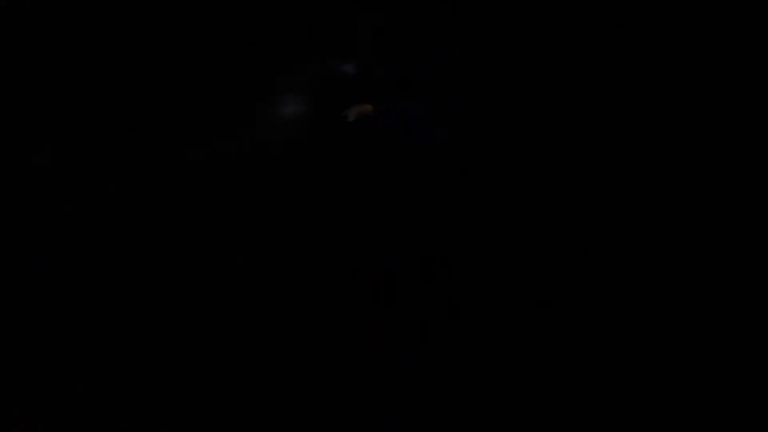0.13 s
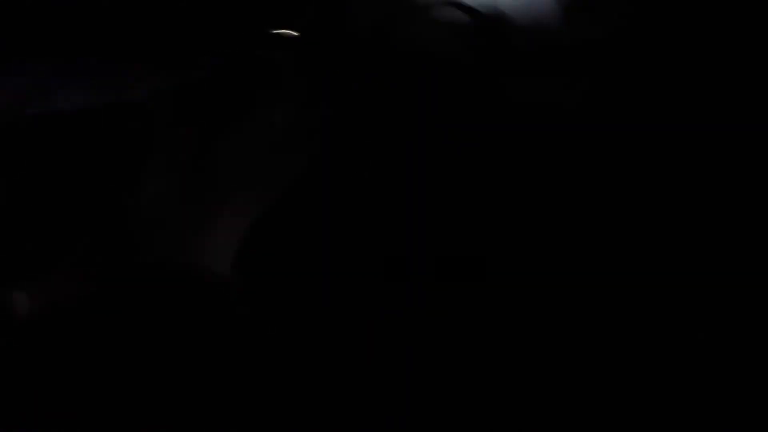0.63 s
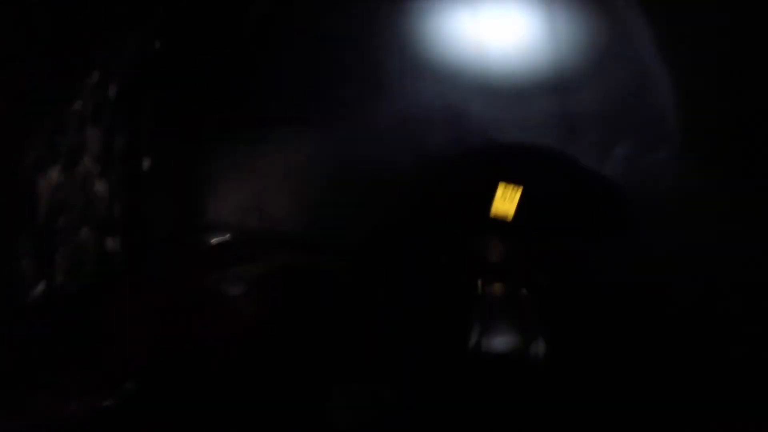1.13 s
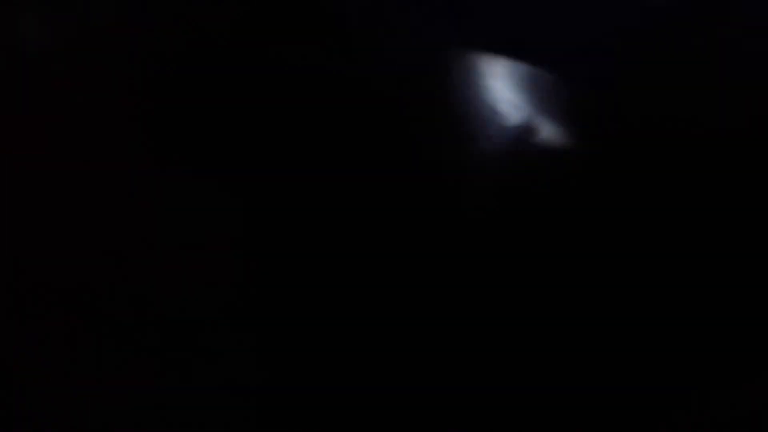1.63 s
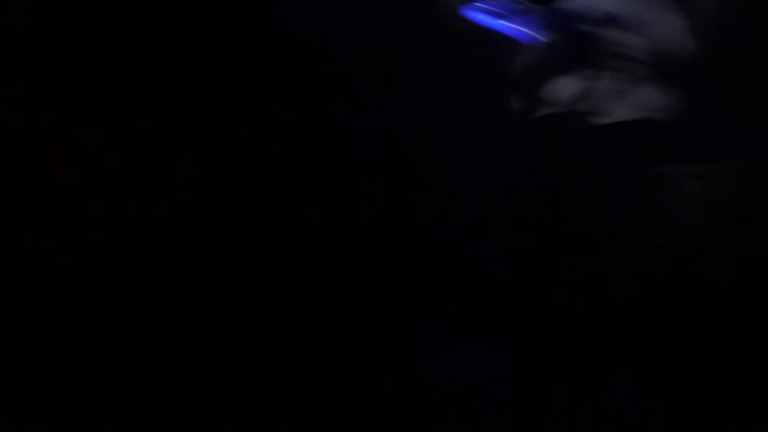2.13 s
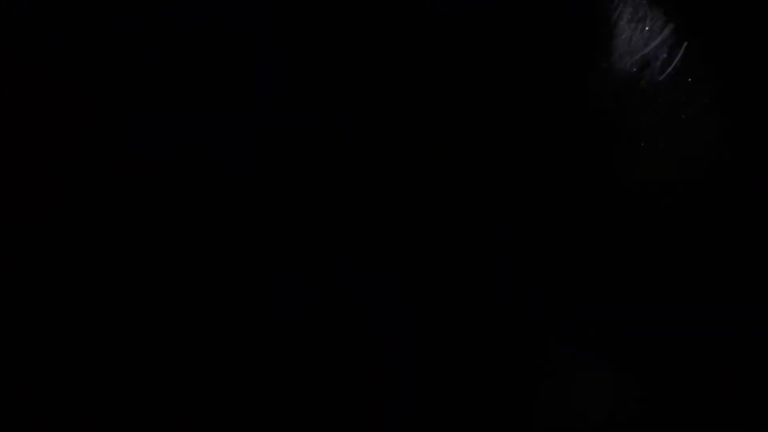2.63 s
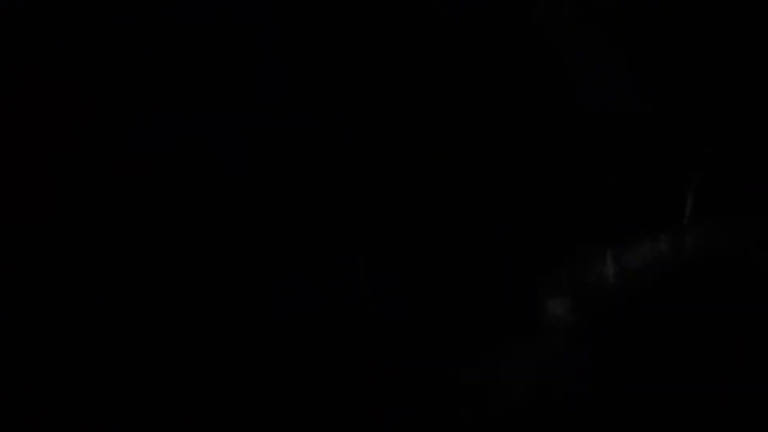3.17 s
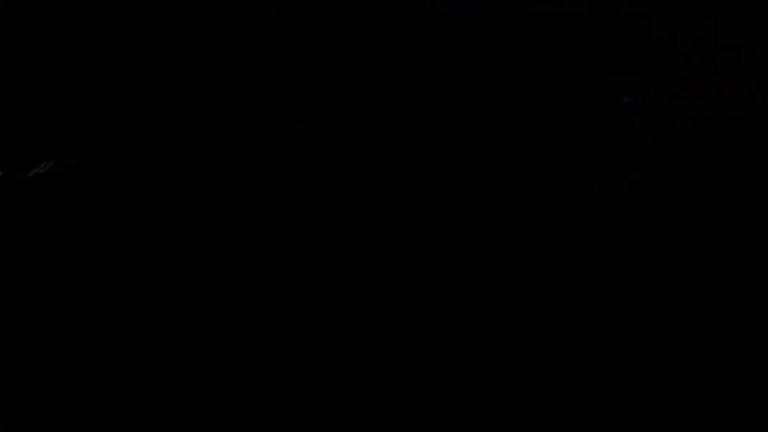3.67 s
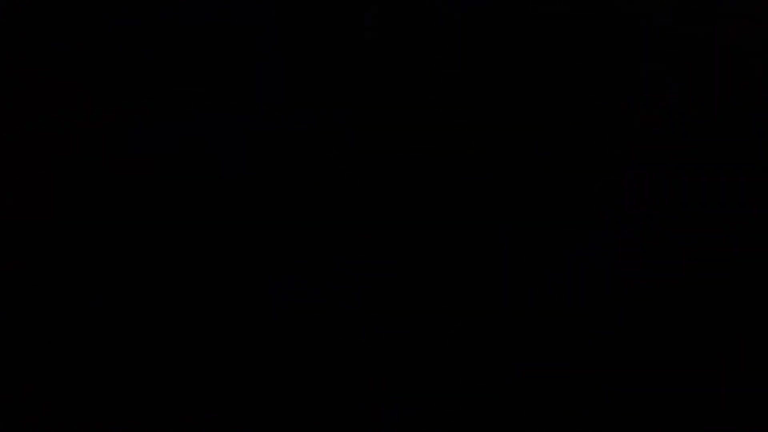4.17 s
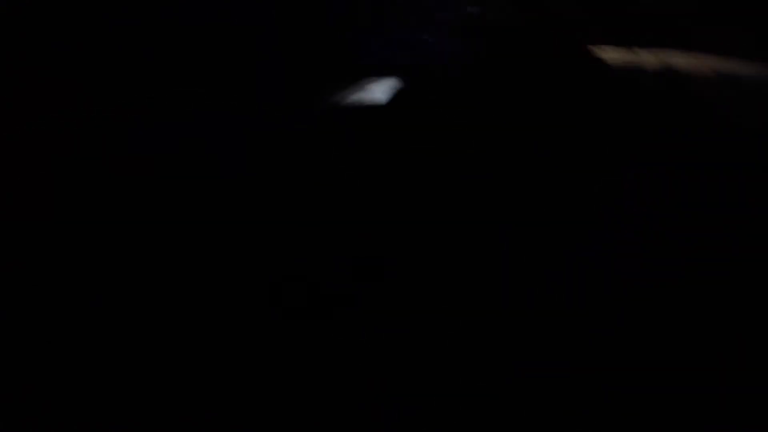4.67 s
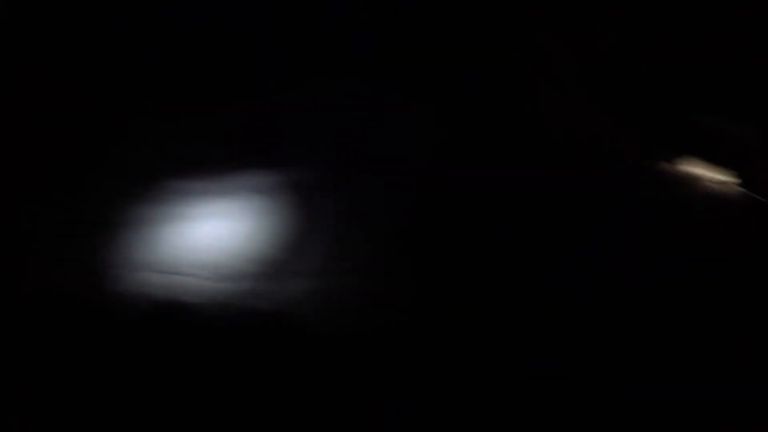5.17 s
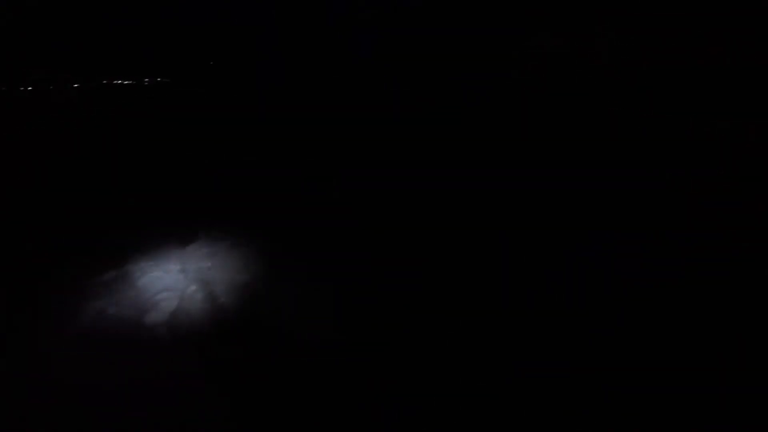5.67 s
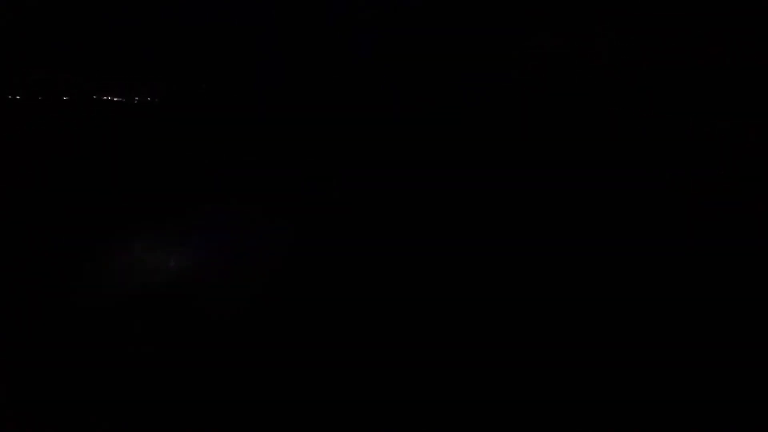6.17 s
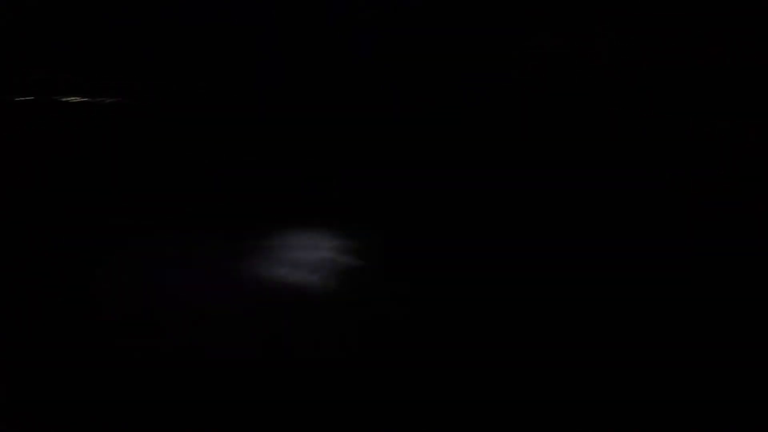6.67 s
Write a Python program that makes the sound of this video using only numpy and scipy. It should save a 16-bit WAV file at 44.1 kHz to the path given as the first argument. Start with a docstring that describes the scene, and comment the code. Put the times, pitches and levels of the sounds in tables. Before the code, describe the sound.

Close engine roar dips and climbs, violent snow impacts hit the microphone, then rough uneven idling continues with sharp ticks and glove rubs.

```python
"""A three-cylinder snow machine slows, thumps down, then revs hard under a helmet camera: tones locked to
the engine cycle ride over beating noise, track gears whine as swept tones, and snow sprays as grainy noise.
The rider tumbles: snow slams the camera as short noise bursts through the modes of its case.
The engine settles to a lumpy idle of pulses ringing a silencer and pipe, with noisy clatter.
Meanwhile ice and, late on, valve taps click, gloves rub on the case, and wind and bumps shake the microphone."""
import sys
import numpy as np
from scipy import signal
from scipy.fft import rfft, irfft, next_fast_len
from scipy.io import wavfile
from scipy.ndimage import uniform_filter1d, map_coordinates

SR = 44100
rng = np.random.default_rng(int(sys.argv[2]) if len(sys.argv) > 2 else 0)


def undo_db(level):
    """Turn decibels back into plain size, where 20 dB means ten times bigger."""
    steps = np.asarray(level, float) / 20
    return 10 ** steps


def dump(signal):
    """Clip the signal to [-1, 1] and save it as 16-bit WAV at the path in sys.argv[1]."""
    limited = np.clip(np.atleast_2d(signal).T, -1, 1)
    pcm = np.round(limited * 32767).astype(np.int16)
    wavfile.write(sys.argv[1], SR, pcm)


N = 300321
T = np.arange(N) / SR

# Wind buffeting, riding and then lying in the snow. Each row: time in seconds, relative level in dB.
WIND_SPELLS = [
    [(0.0, -34), (0.3, -31), (0.95, -39), (1.3, -30), (1.6, -32)],
    [(1.76, -48), (2.1, -57), (2.4, -50), (2.76, -53), (3.2, -40), (3.6, -50), (4.3, -55), (4.6, -59),
     (6.81, -57)],
]
# Bumps on the camera. Each row: start in seconds, swing in Hz, relative level in dB, direction +1 or -1.
BUMPS = [(0.15, 40, -12, 1), (0.158, 67, -6.5, 1), (0.167, 45.6, -4, -1), (0.188, 51, -10, 1),
         (0.24, 30, -21, -1), (1.42, 35, -18.5, 1), (1.424, 76, -11, 1), (1.438, 100, -11, -1),
         (1.6141, 137, 1, -1), (1.617, 160, -1.5, 1), (1.62, 110, -24, 1), (1.6245, 111, -10, -1),
         (1.6355, 152, -9.5, -1), (1.646, 60, -15, 1), (1.7042, 107, -7.5, -1), (1.712, 90, -11, 1),
         (1.726, 204, -9.5, -1), (1.739, 40, -25, -1), (2.299, 40.4, -30, 1), (2.326, 64.4, -19.5, 1),
         (2.35, 29.4, -24.5, 1), (2.965, 35, -25.5, 1), (4.233, 40, -22, 1), (5.961, 30, -37, 1),
         (6.34, 28, -32, 1)]
# Thin tones that start as the tumble's slams die down. Each row: start in seconds, pitch in Hz,
# peak level in dB, time to fall 60 dB in seconds.
LINGERING_TONES = [(1.742, 1870, -43, .25), (1.72, 465, -46, 2.2)]

# Snow and knuckles slam the case. Each row: start in seconds, length in seconds, relative level in dB,
# treble drive in dB over it.
SLAMS = [(0.16, 0.006, -12, -4.5), (0.183, 0.014, -20.5, -6), (1.613, 0.0085, 4.5, -5),
         (1.6182, 0.005, -5, -4), (1.626, 0.006, -15, -8), (1.6299, 0.013, -7.5, -11),
         (1.638, 0.007, -18, -5), (1.6467, 0.014, -9, -5.5), (1.659, 0.008, -28, -4),
         (1.6638, 0.0087, -33, -8), (1.697, 0.007, -30, -7), (1.7039, 0.0055, -5, -11),
         (1.7133, 0.016, -6.5, -10), (1.7193, 0.018, -13, -12), (1.735, 0.025, -37, 2),
         (1.757, 0.016, -36, -16), (3.234, 0.018, -38, -20), (3.259, 0.015, -30.5, 0),
         (4.228, 0.15, -31, 1)]
# Gloves rub along the case. Each row: start in seconds, length in seconds, relative level in dB,
# treble drive in dB over it, low knock drive in dB over it.
RUBS = [(1.842, 0.21, -48, -1.5, -30), (2.314, 0.018, -40.5, -19, 14), (2.333, 0.015, -33, -21, 7.5),
        (2.348, 0.014, -38, -15, 0), (2.885, 0.067, -43, -6, -8), (3.237, 0.1, -32.5, 2, -9),
        (3.235, 0.02, -53.5, -20, 29.5), (3.392, 0.11, -30, -2, -35), (3.477, 0.15, -38.5, -1.5, -17),
        (3.605, 0.096, -37.5, -33, -25), (4.192, 0.12, -36.5, -5, -3), (4.227, 0.029, -55, -20, 30.5),
        (4.375, 0.18, -39, -5, -27), (4.427, 0.21, -48, 5.5, -12)]
# Ticks near the camera: ice, and late on some valve taps of the engine. Each row: start in seconds,
# relative level in dB, treble drive in dB over it.
TICKS = [(2.3158, -25, -5), (2.3978, -12, -3), (2.4244, -23, 14), (2.437, -23, 7), (2.444, -8.5, -2),
         (2.4804, -11.5, 14.5), (2.586, -30, 10), (2.605, -36, 17), (2.6902, -19, 13), (2.7505, -34, 22.5),
         (2.758, -32, 16), (2.8795, -17, 0), (2.92, -25, 14), (2.9635, -14, 18), (2.9683, -10, 4),
         (3.002, -19, 5), (3.031, -11.5, -13), (3.092, -12, -25), (3.323, 7.5, 1.5), (3.3448, -15, 2),
         (4.2197, -10, -12), (5.011, -14.5, -5), (5.2593, -14.5, -2.5), (5.285, -20, -14), (5.997, -24, -5),
         (6.156, -26, -7), (6.52, -25, -2), (6.705, -28, -5)]
# Low modes of the camera case, the knock first. Each row: centre in Hz, width in Hz, relative level in dB.
CASE_LOW_MODES = [(680, 102, 3), (1396, 1330, -5), (2406, 510, 2.5), (3590, 250, -3)]
# High modes of the case. Each row: centre in Hz, width in Hz, relative level in dB.
CASE_HIGH_MODES = [(5050, 2400, -3.5), (6700, 1150, 1), (8720, 950, -5), (12000, 3800, -12.5)]

# Track gear whine. Each row: time in seconds, pitch in Hz, peak level in dB,
# peak level in dB of the tone at four times the pitch.
GEAR_WHINE = [(.72, 2010, -45, -67), (.775, 2255, -24, -62), (.88, 2630, -27, -61), (1.05, 3050, -31, -69),
              (1.15, 3178, -60, -40), (1.245, 3275, -40, -35), (1.27, 3303, -21, -36),
              (1.32, 3290, -26, -35), (1.36, 3320, -36, -37), (1.42, 3301, -62, -76)]

# Idle after the fall, as the rider turns about. Each row: time in seconds, then the relative levels of
# exhaust thump in dB, pipe note over it in dB, and clatter in dB.
IDLE_LEVELS = [(1.665, -40, -3, -68), (1.76, -38, -8, -49), (1.81, -42, -7, -42),
               (1.87, -39.5, -12.5, -40.5), (2.15, -38.5, -11, -39.5), (2.33, -35, -32, -38),
               (2.45, -40, -16, -42), (2.81, -34.5, -12.5, -43.5), (3.11, -31.5, -10, -36),
               (3.3, -28.5, -18.5, -32.5), (3.66, -26.5, -14.5, -38), (4.05, -27.5, -20.5, -33),
               (4.35, -28.5, -17, -32), (4.5, -31, -14, -35.5), (4.8, -31, -26, -32.5),
               (5.04, -32.5, -22, -32.5), (5.43, -34, -14, -32), (5.77, -33.5, -16, -37.5),
               (6.81, -34.5, -17, -38.5)]
# Engine speed after the fall. Each row: time in seconds, engine cycles in Hz.
IDLE_SPEED = [(1.75, 33.0), (1.9, 26.99), (2.0, 24.06), (2.1, 19.55), (2.2, 17.38), (2.6, 16.51),
              (2.8, 17.1), (3.1, 15.21), (3.35, 14.39), (3.7, 13.65), (5.0, 12.35), (5.5, 12.84),
              (6.0, 12.43), (6.25, 12.87), (6.81, 12.56)]
# Strength of the three firings of a cycle, one relative level in dB each.
CYLINDER_DB = [0, -11, -.5]
# Uneven spacing of the three firings, one lag in seconds each.
CYLINDER_LAG_S = [0, -.001, .0009]
# Resonances of silencer, pipe and upper pipe, one list each. Each row: centre in Hz, width in Hz,
# relative level in dB.
PIPE_MODES = [
    [(109.4, 49, 20.5), (160, 32, 15.5), (243, 13, 18)],
    [(318, 52, 0)],
    [(458, 87, 0)],
]
# Tones of the pipe, gliding with the engine's firing rate. Each row: multiple of the firing rate,
# relative level in dB.
PIPE_TONES = [(7, -1), (8, 3.5), (9, -18), (10, -16)]
# Where those tones sing loudest. Each row: centre in Hz, width in Hz, relative level in dB.
PIPE_TONE_MODES = [(345, 110, 0)]
# Tones of the upper pipe. Each row: multiple of the firing rate, relative level in dB.
UPPER_TONES = [(12, -1), (13, -3.5)]
# Spells in which the upper pipe comes forward. Each row: start in seconds, length in seconds.
UPPER_SPELLS = [(1.61, 0.35), (3.75, 2.1)]
# Valve taps. Each row: lead on the firing in firings, relative level in dB, decay constant in firings.
VALVE_TAPS = [(.43, 1, .12), (.22, -6, .1), (.9, -9, .08)]
# Colour of the clatter. Each row: frequency in Hz, relative level in dB per Hz.
CLATTER_COLOUR = [(230, -9), (330, -3), (480, -8), (533, -9), (590, -11), (742, -12), (1180, -5),
                  (1370, -1), (2280, -3.5), (2600, -2), (3000, -7), (3420, -12), (4500, -13.5), (5850, -40),
                  (9900, -120)]
# Colour of the hiss. Each row: frequency in Hz, relative level in dB per Hz.
HISS_COLOUR = [(2470, -36), (4200, -35), (5050, 0), (5620, -5.5), (6910, -2.5), (8310, -14.5),
               (9940, -10.5), (11100, -17.5), (15000, -25), (16000, -52)]

# Riding. Each row: time in seconds, engine cycles in Hz, loudness of the machine in dB, throttle from 0 to 1.
RIDE = [(0.0, 57.97, -19.5, 0.63), (0.05, 56, -22, 0.6), (0.075, 53, -24, 0.1), (0.124, 46.04, -25, 0),
        (0.19, 40.5, -34, 0.45), (0.34, 34.73, -37, 0.4), (0.39, 36.5, -30.5, 1), (0.506, 46.1, -28.5, 1),
        (0.604, 55.17, -25.5, 1), (0.712, 63.95, -22.5, 0.91), (0.788, 67.7, -22, 0.68),
        (0.86, 70.07, -20, 0.86), (1.004, 70.5, -21.5, 0.85), (1.156, 75.8, -20.5, 0.62),
        (1.282, 77.2, -18.5, 0.96), (1.35, 77.2, -19, 0.5), (1.39, 76.2, -18.5, 0.15),
        (1.524, 63.6, -20.5, 0), (1.61, 61.95, -21, 0)]
# Engine tones. Each row: order (multiple of the cycle rate), level in dB over the roar at full throttle,
# before the exhaust colours it.
ENGINE_ORDERS = [(1, -18.5), (2, -17), (3, -2), (4, -10.5), (5, -6), (6, -1.5), (7, -18), (8, -18),
                 (9, 3.5), (10, -17), (11, -33), (12, -1), (13, -19), (14, -30), (15, -5), (16, -28),
                 (17, -9.5), (18, -9), (19, -21), (20, -21), (21, -11)]
# What the exhaust passes. Each row: frequency in Hz, gain in dB.
EXHAUST_PASS = [(110, 5), (170, 1), (215, -7), (260, 3), (330, 3.5), (420, -9), (500, 1), (600, -6.5),
                (690, -5.5), (800, -21), (900, -7), (1400, -16)]
# Colour of the roar. Each row: frequency in Hz, relative level in dB per Hz.
ROAR_COLOUR = [(35, -40), (60, -9.5), (227, -1), (281, 5), (458, -8.5), (785, -13.5), (1220, -13.5),
               (1470, -10), (1660, -13), (2140, -11.5), (4220, -16.5), (6430, -15.5), (13000, -52),
               (14900, -78.5), (16000, -69)]
# Body panels ringing in the roar. Each row: centre in Hz, width in Hz, relative level in dB.
COWL_MODES = [(1494, 73, 7.5), (2275, 157, 11)]
# Colour of the snow spray. Each row: frequency in Hz, relative level in dB per Hz.
SPRAY_COLOUR = [(880, -44), (1500, 0.5), (1920, -13), (2250, -1), (3060, 4), (4240, -12), (4780, -2),
                (7460, -8), (13100, -15.5), (15400, -33), (16000, -70)]


def unit(x):
    """Scaled to rms 1."""
    return x / np.sqrt(np.mean(x ** 2) + 1e-20)


def steady(x):
    """Scaled to a running rms of 1 over a third of a second."""
    return x / np.sqrt(np.abs(uniform_filter1d(x ** 2, SR // 3)) + 1e-12)


def ramp(start_s, rise_s):
    """Climbs from 0 to 1."""
    return np.clip((T - start_s) / rise_s, 0, 1)


def curves(rows):
    """A gate over the table's span with 5 ms fades outside it, then one value per sample for each column."""
    s, *columns = np.transpose(rows)
    gate = np.clip(np.minimum(T - s[0] + .005, s[-1] + .005 - T) / .005, 0, 1)
    return [gate] + [np.interp(T, s, column) for column in columns]


def wobble(rate):
    """A smooth random curve, rate knots a second."""
    knots = rng.standard_normal(int(N * rate / SR) + 4)
    return map_coordinates(knots, [T * rate])


def noise():
    """Fresh white noise."""
    return rng.standard_normal(N)


def filtered(x, response):
    """x times a complex response of frequency."""
    m = next_fast_len(N + SR // 2)
    return irfft(rfft(x, m) * response(np.fft.rfftfreq(m, 1 / SR)), m)[:N]


def resonant(x, modes, sign=-1):
    """x through causal (Hz, width, dB) resonances; a negative sign fills their valleys, a positive deepens them."""
    def response(f):
        return sum(sign ** k * undo_db(db) * 1j * f * width / (hz * hz - f * f + 1j * f * width)
                   for k, (hz, width, db) in enumerate(modes))
    return filtered(x, response)


def coloured(x, spectrum):
    """x shaped by (Hz, dB) points on a log axis, rms 1."""
    hz, db = np.transpose(spectrum)
    return unit(filtered(x, lambda f: undo_db(np.interp(np.log(f + 1), np.log(hz + 1), db))))


def wind():
    """Lumpy low buffeting of the microphone: dark noise with a wandering level."""
    level = sum(gate * undo_db(db + 9.0) for gate, db in map(curves, WIND_SPELLS))
    lumps = undo_db(2.5 * wobble(10))
    rumble = coloured(noise(), [(10, 2.5), (24, 1), (45, -15), (90, -15.5), (300, -64.0)])
    return level * unit(lumps * rumble)


def bumps():
    """Each bump swings the microphone membrane once or twice."""
    out = np.zeros(N + SR)
    t = np.arange(SR // 5) / SR
    for s, hz, db, direction in BUMPS:
        cycles = t * hz
        swing = np.sin(2 * np.pi * cycles) * np.exp(-1.8 * cycles ** 1.3)
        out[round(s * SR):][:len(t)] += direction * undo_db(db + 4.5) * swing
    return out[:N]


def lingering_tones():
    """Thin, slightly unsteady tones that start as the tumble's slams die down and fade exponentially."""
    out = 0
    for s, hz, db, t60 in LINGERING_TONES:
        since = np.clip(T - s, 0, None)  # zero, hence silent, before the start
        out = out + undo_db(db - 60 * since / t60 + 1.1 * wobble(24.8)) * np.sin(2 * np.pi * hz * since)
    return out


def case():
    """Slams, gritty rubs and sharp ticks, all noise bursts heard through the modes of the camera case."""
    low, knock, high = np.zeros((3, N))
    grit = noise() * undo_db(3.8 * wobble(450) + 1.2 * wobble(70))
    # slams die by 24 dB over their length and knock at -9 dB; rubs hold their level
    contacts = [(*row, -9, 24) for row in SLAMS] + [(*row, 0) for row in RUBS]
    for s, length, db, treble_db, knock_db, fade_db in contacts:
        u = np.linspace(0, 1, round(length * SR))
        span = slice(round(s * SR), round(s * SR) + len(u))
        envelope = np.clip(np.minimum(u * 16, (1 - u) * 3), 0, 1)
        contact = grit[span] * undo_db(db - fade_db * u) * envelope
        low[span] += contact
        knock[span] += undo_db(knock_db) * contact
        high[span] += undo_db(treble_db) * contact

    # 32 faint ticks as the snow settles, from 2.38 to 2.96 s
    crackle = [(2.38 + 0.58 * when, -44 + 10 * (size - .5), 15) for when, size in rng.random(size=(32, 2))]
    t = np.arange(SR // 100) / SR
    for s, db, treble_db in TICKS + crackle:
        tick = undo_db(db - 13.0 - 60 * t / 0.0063) * rng.standard_normal(len(t))  # falls 60 dB in 6.3 ms
        low[round(s * SR):][:len(t)] += tick
        high[round(s * SR):][:len(t)] += undo_db(treble_db) * tick
    body = resonant(low, CASE_LOW_MODES[1:]) + resonant(knock, CASE_LOW_MODES[:1])
    return undo_db(10.0) * body + undo_db(3.0) * resonant(high, CASE_HIGH_MODES)


def whine():
    """The track's gear teeth sing, unevenly, as the machine gains speed."""
    gate, hz, db, fourth_db = curves(GEAR_WHINE)
    phase = 2 * np.pi * np.cumsum(hz * (1 + .011 * wobble(250))) / SR
    fourth_phase = 2 * np.pi * np.cumsum(4 * hz * (1 + .003 * wobble(150))) / SR
    tones = undo_db(db) * np.sin(phase) + undo_db(fourth_db) * np.sin(fourth_phase)
    return gate * undo_db(1.8 * wobble(40)) * tones


def firing_pulses(firings, settled):
    """A strong, a weak and a strong puff each cycle, slightly uneven, plus turbulence, rounded by the silencer."""
    number = np.floor(firings).astype(int)
    at = np.flatnonzero(np.diff(number)) + 1
    cylinder = number[at] % 3
    strength = undo_db(np.array(CYLINDER_DB)[cylinder] + .8 * rng.standard_normal(len(at)))
    jitter = 6 * rng.standard_normal(len(at))  # in samples
    place = at + np.round(jitter + SR * np.array(CYLINDER_LAG_S)[cylinder]).astype(int)
    pulses = np.bincount(np.clip(place, 0, N - 1), strength, N)
    pulses += np.interp(settled, [.5, 1], [.022, .002]) * noise()  # less turbulence once settled
    return filtered(pulses, lambda f: 1 / (1 + 1j * f / 380) ** 4)


def idle_exhaust(firings, thump_db, note_db):
    """Firing pulses ring the silencer and pipe over a clean hum and tones locked to the firings."""
    settled = np.clip(ramp(2.05, .45), .1, 1)  # clean tones form once the engine has slowed
    facing = 1 - 0.57 * ramp(4.6, .3)  # silencer body and tones fade as the rider turns from it
    forward = sum(ramp(s, 0.14) - ramp(s + length, 0.12) for s, length in UPPER_SPELLS)

    soft = firing_pulses(firings, settled)
    silencer_modes, pipe_modes, upper_modes = PIPE_MODES
    body_modes, upper_tone_modes = [(273, 116, 0)], [(505, 80, 0)]
    thump = steady(resonant(soft, silencer_modes, sign=0.86))
    # passed twice for steep sides
    note = steady(resonant(resonant(soft, pipe_modes), pipe_modes))
    upper = steady(resonant(resonant(soft, upper_modes), upper_modes))
    body = steady(resonant(resonant(soft, body_modes), body_modes))

    # twice a firing: the intake breathes in between
    hum = np.sqrt(2) * np.cos(2 * np.pi * (2 * firings - .3))
    uneven = undo_db(np.array(CYLINDER_DB)[np.floor(firings).astype(int) % 3])
    drift = .25 * wobble(6)

    def sing(tones):
        return uneven * sum(undo_db(db) * np.cos(2 * np.pi * (k * firings - .5) + drift) for k, db in tones)

    note += 0.89 * facing * settled * resonant(sing(PIPE_TONES), PIPE_TONE_MODES)
    upper_song = resonant(resonant(sing(UPPER_TONES), upper_tone_modes), upper_tone_modes)
    upper += 2.2 * settled * forward * upper_song

    mix = thump + 1.03 * ramp(2.6, 0.92) * hum
    mix += undo_db(-13) * facing * body
    mix += undo_db(note_db + 6.5) * note
    mix += undo_db(-27.5 + 9.5 * forward) * upper
    return undo_db(thump_db - 3.5) * mix


def valve_taps(firings):
    """Loudness swing of the clatter: each tap rises fast and decays, its strength scattered by 2 dB."""
    scatter = rng.standard_normal(int(firings[-1]) + 3)
    stroke = 0
    for lead, db, decay in VALVE_TAPS:
        shifted = firings + lead
        age = shifted % 1
        strength = undo_db(db + 2 * scatter[np.floor(shifted).astype(int)])
        stroke = stroke + strength * (1 - np.exp(-age / .07)) * np.exp(-age / decay)
    tapping = np.interp(ramp(5.52, .99), [0, 1], [.65, 1.2])  # more as the rider faces the engine
    return .5 + 3.2 * tapping * stroke


def idle_clatter(firings, clatter_db):
    """Noise pulsed by the valve taps rings the panels, hisses, and is mirrored by the snow."""
    taps = valve_taps(firings)
    raw = coloured(taps * noise(), CLATTER_COLOUR)
    ringing = ramp(2.2, 0.87) * resonant(raw, [(2362, 16, 1.3), (1152, 17, 10.6)])
    clatter = undo_db(0.26 * wobble(4.44)) * unit(raw + ringing)
    # a cowl panel rings while it points at the camera
    pointing = ramp(2.3, 0.75) - ramp(4.0, 0.6)
    clatter += pointing * resonant(raw, [(1557, 70, 0)])
    grains = np.sqrt(taps) * noise() * undo_db(1.9 * wobble(300))
    hiss = undo_db(-13.5 + wobble(4.3)) * coloured(grains, HISS_COLOUR)

    # the delayed copy combs the sound, its first peak at 2750 Hz
    direct = clatter + hiss
    mirrored = filtered(direct, lambda f: np.exp(-2j * np.pi * f / 2750) / (1 + (f / 3500) ** 4))
    echo = np.interp(ramp(4.92, .99), [0, 1], [.3, .85])
    return undo_db(clatter_db - 7.0) * (direct + echo * mirrored) / np.sqrt(1 + echo ** 2)


def idle():
    """Lumpy idle after the fall: exhaust and clatter share one count of firings, three per engine cycle."""
    gate, thump_db, note_db, clatter_db = curves(IDLE_LEVELS)
    firings = 3 * np.cumsum(curves(IDLE_SPEED)[1]) / SR
    return gate * (idle_exhaust(firings, thump_db, note_db) + idle_clatter(firings, clatter_db))


def spray(roar_db):
    """Thrown snow: grainy noise that grows faster than the roar."""
    landing_db = 1.5 * (1 - ramp(.16, .01))  # snow flies thicker until the first bump
    dig_db = 11.5 * ramp(1.365, 0.0014)  # the braking track digs in
    level_db = -25.5 + 1.34 * (roar_db - roar_db.max()) + dig_db + landing_db
    grains = noise() * undo_db(2.5 * wobble(300))
    return undo_db(level_db + 1.5 * wobble(30)) * coloured(grains, SPRAY_COLOUR)


def roar(turn, roar_db):
    """Broad engine noise that beats with the firings and rings the body panels."""
    beat = 1 + 0.055 * np.cos(3 * turn) + 0.018 * np.cos(turn)
    raw = coloured(beat * noise(), ROAR_COLOUR)
    return undo_db(roar_db + 1.05 * wobble(30.8)) * unit(raw + resonant(raw, COWL_MODES))


def boom(cycle_hz, roar_db, shut_db):
    """The cowl booms at one throbbing pitch, most at top engine speed."""
    level_db = roar_db + 0.35 * shut_db + 3 - 1.5 * np.abs(cycle_hz - 76.2)
    throb = 1 + .7 * np.cos(2 * np.pi * 12.35 * (T - 1.2))  # 12.35 throbs a second, a crest at 1.2 s
    tone = np.sin(2 * np.pi * 289.4 * T + 0.86 * wobble(14.3))
    return undo_db(level_db) * undo_db(1.1 * wobble(14.7)) * unit(throb * tone)


def snarl(turn, roar_db, shut_db):
    """The shaft's high orders ring in the body panels."""
    shaft = sum(undo_db(4 * wobble(8)) * np.sin(order * turn + .25 * wobble(15)) for order in range(11, 72))
    modes = [(980, 440, 4.5)] + COWL_MODES + [(2830, 1500, -1.5), (4650, 1800, -0.5)]
    return undo_db(roar_db + shut_db / 2 - 3) * unit(resonant(shaft, modes))


def exhaust_orders(cycle_hz, turn, roar_db, shut_db):
    """Sines at multiples of the engine cycle, coloured by the exhaust, each wandering in level and phase."""
    # on the overrun, as speed falls by up to 22 Hz a second; not heard below 50.5 Hz
    slowing = -uniform_filter1d(np.gradient(cycle_hz) * SR, SR // 20)
    overrun = np.clip(slowing / 22, 0, 1) * np.clip((cycle_hz - 50.5) / 6, 0, 1)
    pipe_hz, pipe_db = np.transpose(EXHAUST_PASS)
    out = 0
    for order, db in ENGINE_ORDERS:
        level_db = roar_db + db + 3 * wobble(11.94)
        level_db += shut_db * min(order / 9.2, 1)  # a shut throttle takes less from the lower orders
        level_db += np.interp(np.log(order * cycle_hz), np.log(pipe_hz), pipe_db)
        level_db += overrun * (0.5 if order % 6 else 8)  # dB; multiples of six gain most
        phase = order * turn + 0.24 * wobble(25.9) + rng.uniform(0, 2 * np.pi)
        out = out + np.sqrt(2) * undo_db(level_db) * np.sin(phase)
    return out


def ride():
    """The ridden machine: speed, loudness and throttle drive spray, roar, boom, snarl and exhaust together."""
    gate, cycle_hz, roar_db, throttle = curves(RIDE)
    turn = 2 * np.pi * np.cumsum(cycle_hz) / SR
    shut_db = -30 * (1 - throttle)
    machine = spray(roar_db) + roar(turn, roar_db) + boom(cycle_hz, roar_db, shut_db)
    machine += snarl(turn, roar_db, shut_db) + exhaust_orders(cycle_hz, turn, roar_db, shut_db)
    return gate * machine


def scene():
    """All sources at the single microphone."""
    return (wind() + bumps() + lingering_tones() + case() + whine() + idle() + ride())[None]


def band_limit(x):
    """A steep low-pass at the top of the band."""
    return signal.sosfilt(signal.butter(12, 16500, fs=SR, output="sos"), x)


def record(dry):
    """The input stage clips the slams with a slightly rounded knee."""
    clipped = dry / (1 + np.abs(dry / .99) ** 12) ** (1 / 12)
    return band_limit(clipped)


dry = scene()
out = record(dry)
dump(out)
```